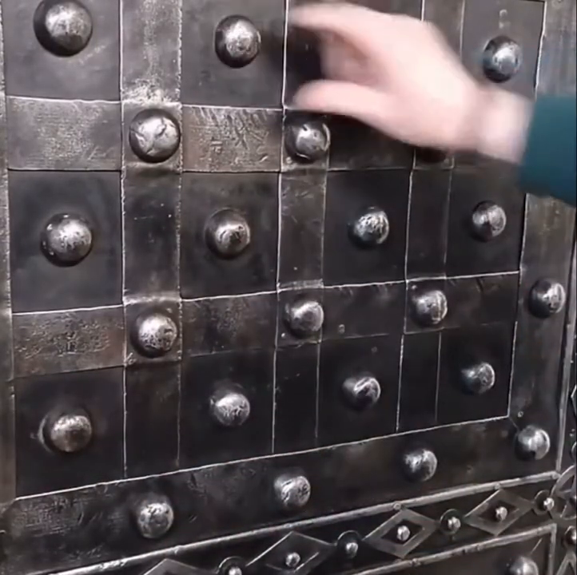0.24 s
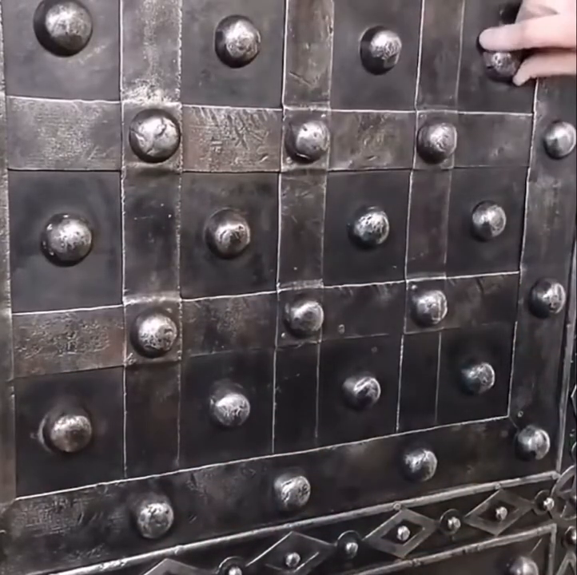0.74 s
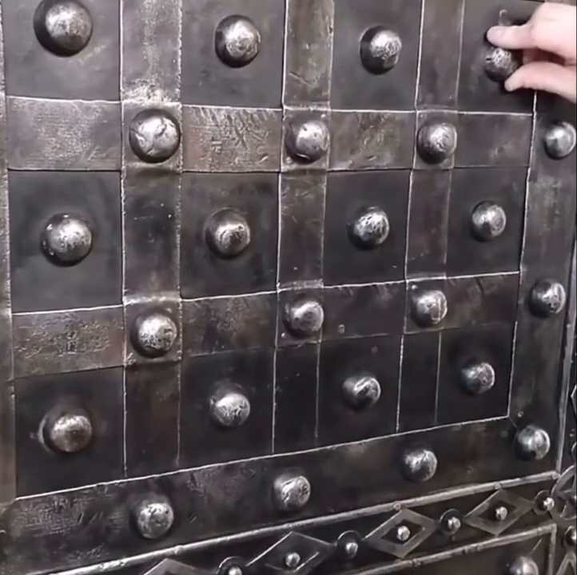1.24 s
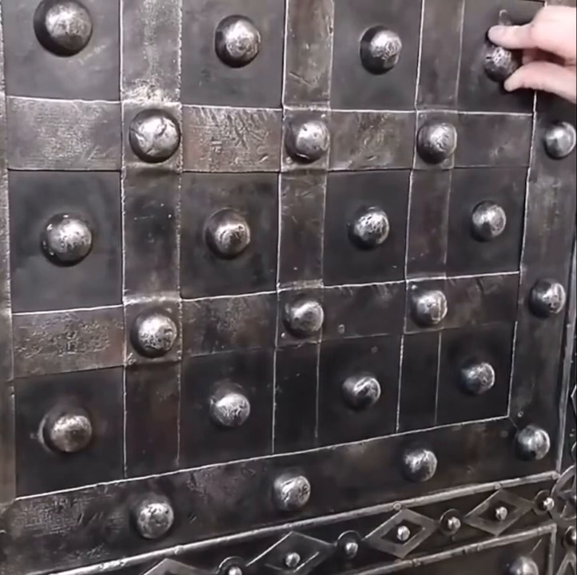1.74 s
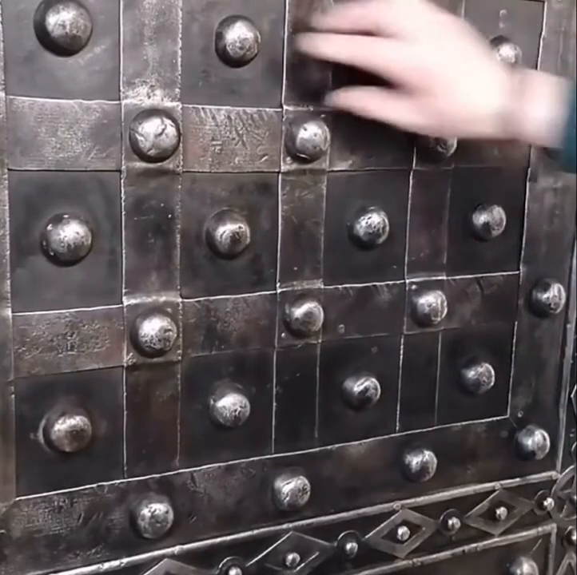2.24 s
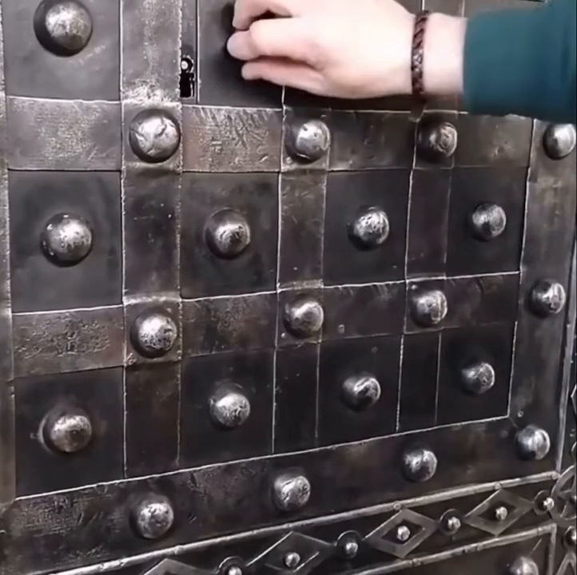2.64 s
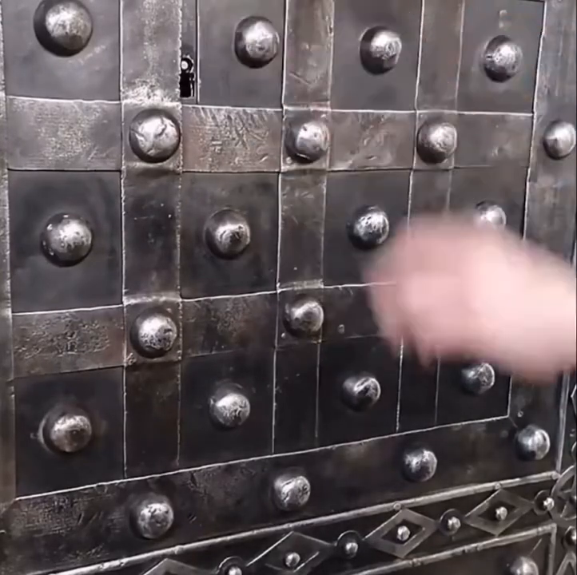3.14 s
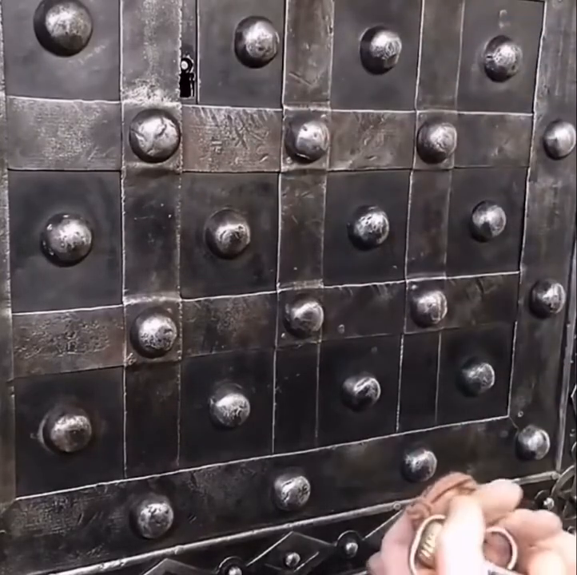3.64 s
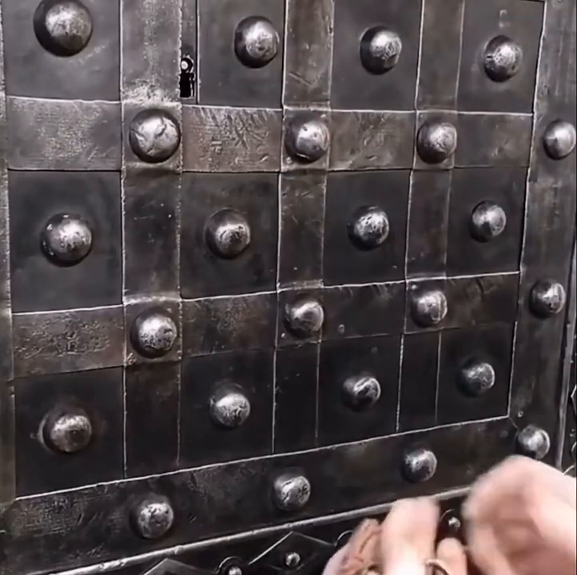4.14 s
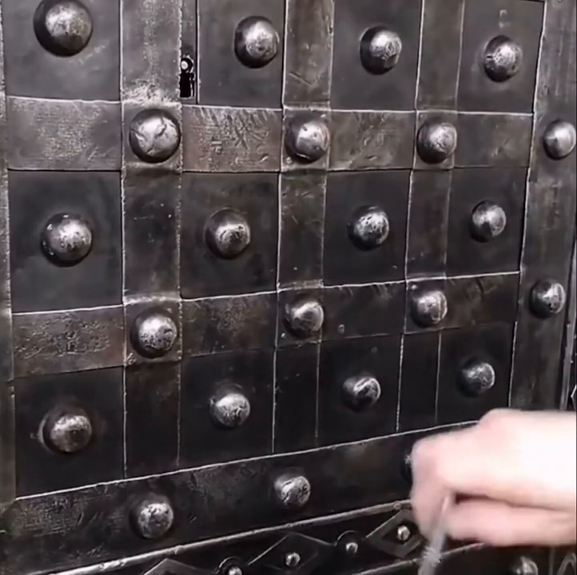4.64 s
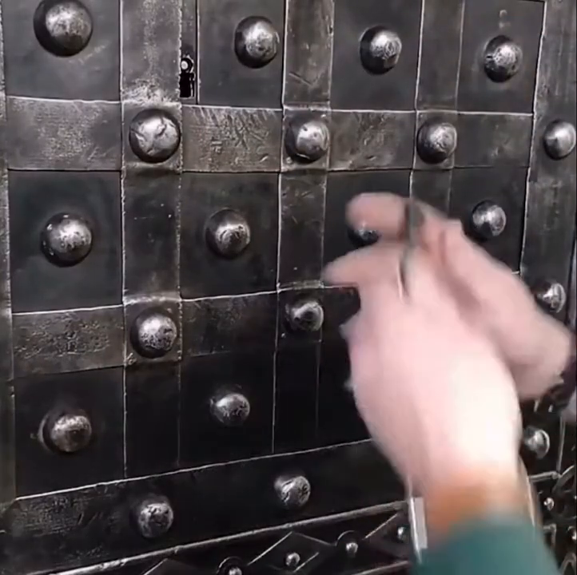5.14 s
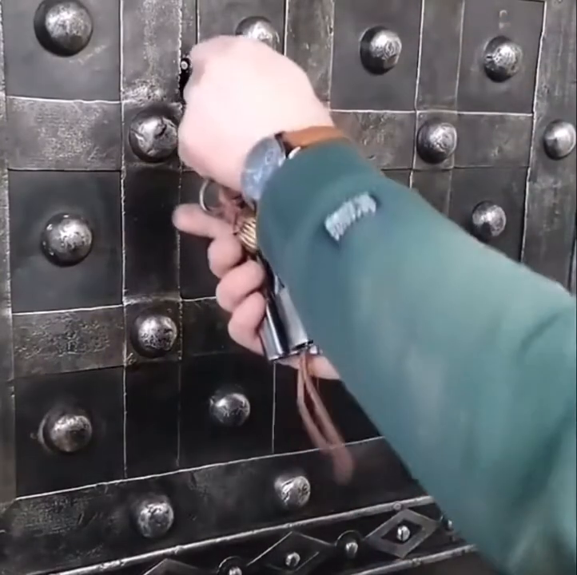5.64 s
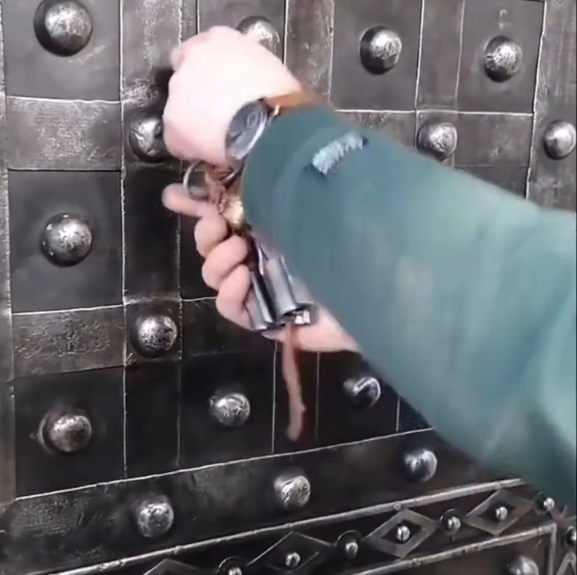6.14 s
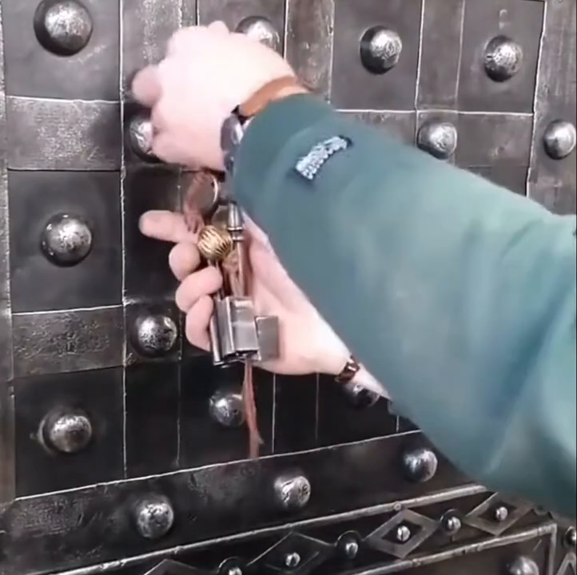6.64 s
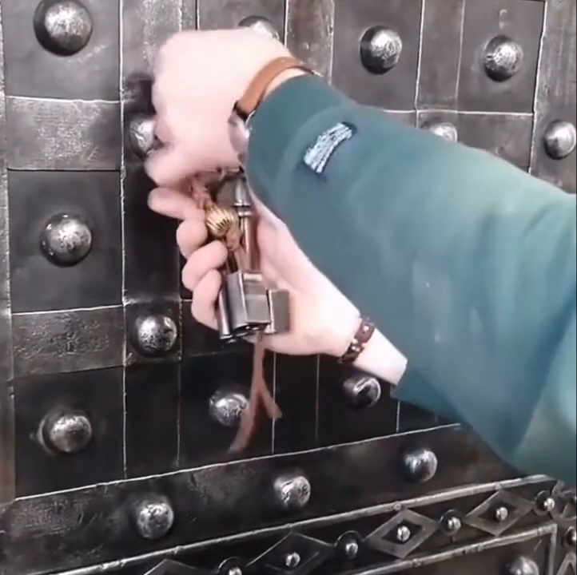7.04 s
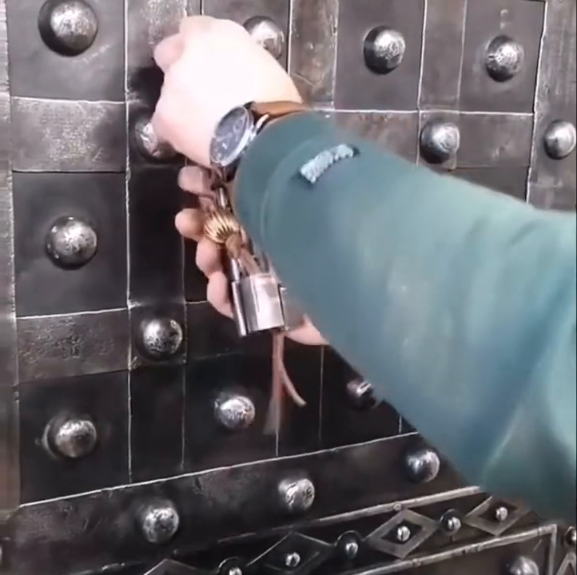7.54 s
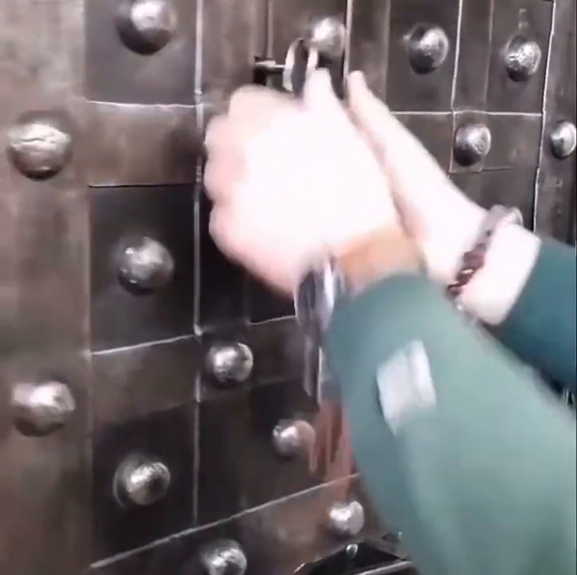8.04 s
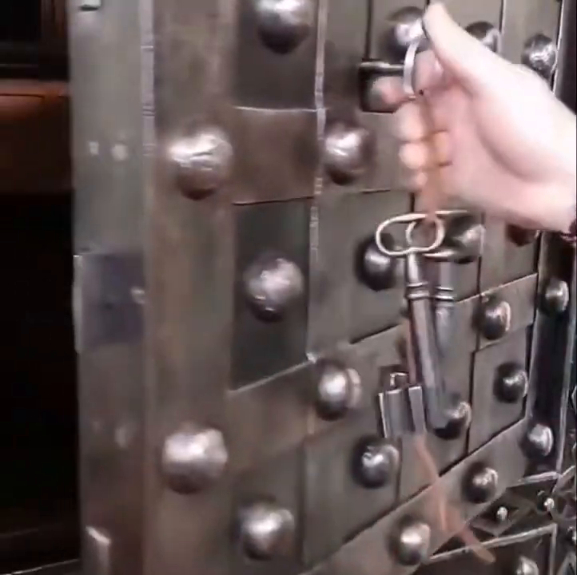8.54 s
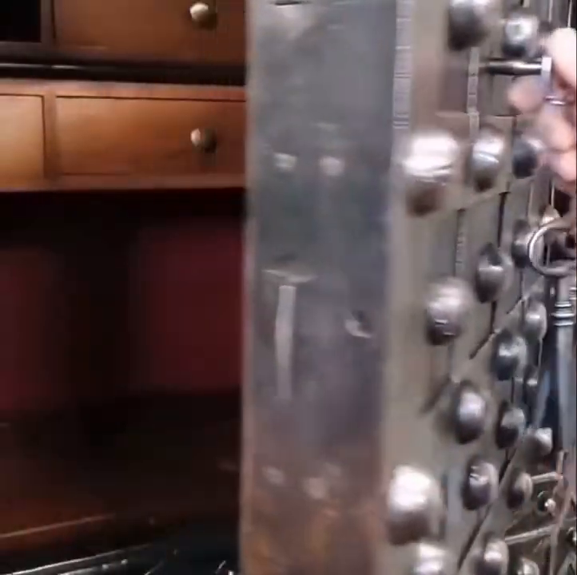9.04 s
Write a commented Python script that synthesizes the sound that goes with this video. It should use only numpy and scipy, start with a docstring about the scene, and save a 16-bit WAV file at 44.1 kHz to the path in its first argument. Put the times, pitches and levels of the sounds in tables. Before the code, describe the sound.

Dry, even metal ticks come first, then a muffled low thump and two sharp snaps. After a quiet moment of rumbling air, a bunch of large iron keys rings brightly. A key grinds and knocks in an old lock, building to a very loud bolt clunk and a second, weaker one. Loose keys tinkle and iron knocks as the heavy door swings. Close microphone, reverberant room, faint hiss.

```python
"""An old iron safe is opened in an echoing room, over rumbling ventilation (filtered noise) and faint hiss.
A stud ticks round on its ratchet (short noise bursts), a hidden catch slides and thumps (jerky noise,
low fading tones), the keyhole cover snaps aside (two sharp noise bursts), and a bunch of big keys clinks
(bursts and wavering tones). A key scrapes into the lock and throws the bolts in growing jerks (bursts,
short tones, jerky noise), and the door swings open with the keys dangling (more knocks, thumps and clinks)."""
import sys
import numpy as np
from scipy import signal
from scipy.fft import rfft, irfft, next_fast_len
from scipy.io import wavfile

SR = 44100
rng = np.random.default_rng(int(sys.argv[2]) if len(sys.argv) > 2 else 0)


def persist_wave(psi):
    """Save psi, clipped to +-1, as 16-bit WAV."""
    counts = np.round(np.clip(psi, -1, 1) * 32767).astype(np.int16)
    wavfile.write(sys.argv[1], SR, np.atleast_2d(counts).T)


N = 410438  # length in samples

# In every table and setting, t60 is the time a sound takes to fall by 60 dB.

# the ventilation's rumble swells once, then eases a little: (time [s], level [dB])
VENT_SWELL = [(2.7, -39), (3.5, -32.5), (6.5, -30.5), (9.3, -32.5)]
# low room modes that the ventilation excites: (frequency [Hz], width [Hz], level [dB])
ROOM_BOOM = [(63, 23.8, -0.5), (172.6, 11, -22), (269.3, 11, -29)]
# colour of the air noise: (frequency [Hz], level [dB])
AIR_COLOUR = [(12, -61), (20, -46), (41, -7), (64, -4), (148, -14), (180, -16.5), (274, -27.5),
              (333, -26.5), (465, -35), (505, -34), (1160, -47), (1720, -49.5), (3450, -60.5), (5850, -64),
              (15500, -82.5)]
# colour of the microphone hiss: (frequency [Hz], level [dB])
HISS_COLOUR = [(8000, -29), (11500, -8), (13000, 1), (15500, -4)]

# single ticks as the stud is gripped, meets its stop and settles: (time [s], level [dB])
STUD_TICKS = [(0.0642, -44.5), (0.827, -37), (0.9902, -44), (1.1257, -50.5), (1.3175, -46)]
# colour of the stud's ticks: (frequency [Hz], level [dB])
STUD_COLOUR = [(300, 3), (700, -6), (1200, 8), (2000, 3.5), (2800, 6), (4200, -27.5), (7000, -24),
               (13000, -35)]
# every ratchet tooth clicks, and the pawl drops back more softly part of a tooth later
RATCHET_START_S, TOOTH_S = 0.2135, 0.154
PAWL_SHARE = 0.55  # part of a tooth's time
TOOTH_DB, PAWL_DB = -37, -43.5
# how quickly the first crack of a blow dies, on the stud and in the lock
STUD_CRACK_T60_S, IRON_CRACK_T60_S = 0.014, 0.025

# how long the room's echo lasts: (frequency [Hz], t60 [s])
ROOM_T60 = [(200, 0.93), (600, 0.7), (1500, 0.76), (3700, 0.71), (7000, 0.47), (12000, 0.42)]
EDGES_HZ = 22 * 2 ** (np.arange(20) / 2)  # borders of the half-octave bands

# iron sliding on iron: (start [s], end [s], level [dB])
STROKES = [(1.69, 1.883, -49), (6.0, 6.2, -49.5), (6.273, 6.674, -41), (7.052, 7.2, -37.5),
           (7.25, 7.32, -35.5), (8.054, 8.123, -36.5)]
STROKE_RISE_DB_PER_S, STROKE_FALL_DB_PER_S = 354, 138.5
# colour of the scraping: (frequency [Hz], level [dB])
RUB_COLOUR = [(80, 9), (170, 22), (300, 10.5), (550, 10.5), (800, -0.5), (1100, 4), (2800, -13.5),
              (6000, -32.5), (10000, -39), (14000, -59.5)]

# iron meeting iron: (time [s], level [dB], hardness [0-1], pitch of the struck part [Hz])
CONTACTS = [(1.731, -47, .1, 820), (1.85, -48.5, 0, 950), (2.131, -50, 0.9, 816),
            (2.419, -42.5, 0.07, 1030), (2.706, -33, 0.91, 2370), (2.761, -29, 0.82, 2465),
            (3.217, -46.5, 0.75, 750), (5.61, -40, 0.3, 750), (5.936, -30, 0.43, 700),
            (5.947, -24.5, 0.7, 1994), (6.155, -35.5, 0.13, 800), (6.224, -31, 0.57, 1360),
            (6.279, -16.5, 0.77, 845), (6.305, -28, 0.93, 785), (6.437, -25.5, 0.7, 1057),
            (6.568, -27, 0.82, 1684), (6.672, -34, 0.42, 1340), (6.772, -37.5, 0.44, 900),
            (6.816, -34, 0.5, 1380), (7.027, -21.5, 0.63, 820), (7.578, -26, 0.81, 1006),
            (7.641, -33, 0.2, 2690), (8.013, -42, 0.84, 820), (8.062, -24, 0.93, 790),
            (8.817, -20, 0.8, 1087), (8.824, -21.5, 0.67, 1160)]
# colour of blows in the lock: (frequency [Hz], level [dB])
IRON_COLOUR = [(180, 5.5), (400, 3), (700, 7), (1000, 0), (1500, 5.5), (2500, -5), (3600, -3), (5500, -9.5),
               (8000, -19), (10000, -12), (13000, -37)]
# resonances of the door plate, mostly narrow: (frequency [Hz], width [Hz], level [dB])
PLATE = [(826, 8.3, -9.5), (905, 32, -20.5), (1008, 12, -32), (1063, 37, -10.5), (1720, 43, -28.5),
         (2260, 38, -2), (2890, 200, 0.5)]
# a hard contact has less bass and more treble than a soft one: dB against the mids
SOFT_BASS_DB, HARD_BASS_DB, SOFT_TREBLE_DB, HARD_TREBLE_DB = 24, -8.5, -33.5, 9

# heavy parts shoving the door; a brisker shove wakes higher modes: (time [s], level [dB], centre [Hz])
THUMPS = [(1.758, 0, 73), (1.839, -3.5, 91), (2.418, -21, 504), (4.086, -26, 810), (5.931, -14.5, 616),
          (6.04, -11, 116), (7.22, -16.5, 183), (7.584, -11.5, 276), (7.606, -12, 141), (7.795, -26, 383),
          (8.069, -24, 245), (8.82, -16, 86)]
# low modes of the door: (frequency [Hz], level [dB], t60 [s])
DOOR_MODES = [(64.2, -0.5, 0.22), (83.5, -2.5, 0.16), (110.7, -4.5, 0.19), (156, -2, 0.15),
              (180.7, 6.5, 0.062), (240.4, 0, 0.15), (254, -7.5, .14), (359, -3, 0.14), (456, 0.5, 0.066),
              (596, -1, 0.055), (807, 4.5, 0.024)]
THUMP_DB_PER_OCTAVE = 19  # modes away from the centre take less

# keys knocking together: (time [s], click [dB], ring of the long key [dB], ring of the short key [dB])
CLINKS = [(3.624, -44.5, -83, -88), (4.132, -48, -69, -54.5), (4.396, -34, -68, -57),
          (4.421, -24.5, -56, -57), (4.796, -19.5, -27, -40.5), (4.923, -25, -36, -34.5),
          (5.209, -37, -49, -65), (5.319, -45.5, -72, -75), (5.469, -23.5, -48, -42.5),
          (6.302, -44, -41, -46), (6.475, -35, -62, -55), (6.925, -45, -62, -56), (7.17, -39.5, -56, -81),
          (8.06, -34, -66, -46.5), (8.218, -36.5, -56, -74), (8.32, -37, -59, -39.5),
          (8.586, -29, -62.5, -29), (8.725, -35, -68, -37.5), (8.817, -24.5, -65, -35.5)]
# colour of the keys' clicks: (frequency [Hz], level [dB])
KEY_CLICK_COLOUR = [(400, -23), (1200, -11.5), (2200, -0.5), (3200, -7.5), (5000, 3), (7500, 0),
                    (10000, -15.5), (13000, -14)]
# modes of the long key: (frequency [Hz], level [dB], t60 [s])
LONG_KEY_MODES = [(1976, -25, .7), (2745, -21, .45), (2939, -12, .6), (3325, -18, .65), (3690, -4, .55),
                  (4092, 0, .7), (4847, -14, .65), (5284, -6, .65), (5698, -9, .6), (6598, -8, .65),
                  (7603, -12, .55), (7752, -20, .45), (8540, -12, .6), (9742, -18, .45), (10282, -16, .45),
                  (12980, -22, .3)]
# modes of the short key: (frequency [Hz], level [dB], t60 [s])
SHORT_KEY_MODES = [(1540, -25, .45), (1970, -17, .65), (2253, -14, .4), (3219, -22, .35), (4110, -9, .5),
                   (4229, 0, .55), (4360, -18, .4), (5523, -5, .5), (6608, -3, .55), (7625, -18, .45),
                   (9830, -21, .4), (12010, -21, .25)]
# modes of the small fittings on the bunch: (frequency [Hz], level [dB], t60 [s])
FITTING_MODES = [(3160, -7, 0.11), (4113, -6, 0.26), (4010, -12.5, 0.15), (4270, -25, 0.13),
                 (4860, -9.5, 0.1), (5450, -9.5, 0.14), (5485, -3.5, 0.14), (5700, 1.5, 0.048),
                 (6400, -22, 0.12), (6700, -6, 0.1), (6830, -15, 0.098), (7510, -13.5, 0.35),
                 (8810, -14.5, 0.091), (9400, -22, 0.28), (9860, -6.5, 0.18), (11960, 5.5, 0.056)]
FITTINGS_DB = -10  # against the click
# the bunch is shaken and chinks ever more softly: (start [s], end [s], fittings [dB], small pieces [dB])
SHAKES = [(4.426, 4.79, -58, -51), (4.815, 5.15, -40.5, -64), (5.15, 5.45, -62, -65),
          (6.295, 6.66, -46.5, -71), (8.225, 8.56, -54, -68)]
SETTLE_DB_PER_S = 25
CHINK_HZ, CHINK_T60_S = (3840, 10540), 0.093  # pitch range and decay of the small pieces
# a key's bow tapped while gripped, leaving one short tone: (time [s], level [dB], pitch [Hz], t60 [s])
PINGS = [(5.211, -37.5, 2260, 0.23), (5.319, -42.5, 1980, 0.11), (8.589, -36.5, 2253, 0.18)]

# the key's bit catches on the wards while it feels its way in
WARDS_S = (5.6, 7.2)
RATTLE_DB, RATTLE_SPREAD_DB = -2, 8  # against the scrape, and how far a catch strays either way
RATTLE_HARDNESS = 0.4
RATTLE_HZ = (804, 1640)  # pitch range of the parts that it touches
# a bolt jerks along, harder each time, up to its stop:
# (stop time [s], level [dB], time between jerks [s], gain per jerk [dB], hardness [0-1], pitch [Hz])
BOLTS = [(7.241, -8.5, 0.019, 7.5, 0.8, 973), (8.112, -18, 0.013, 2, 0.66, 2565)]

METAL_TOP_HZ, CUTOFF_HZ = 10170, 15700  # treble limits of the metal sounds and of everything


def from_db(db):
    """Turn decibels into a gain."""
    return 10 ** (np.asarray(db) / 20)


def rms_one(x):
    """Scale a sound to an average (rms) strength of 1."""
    return x / np.sqrt(np.mean(x ** 2) + 1e-20)


def in_time(rows):
    """Read a table as a curve with a value at every sample."""
    return np.interp(np.arange(N) / SR, *np.transpose(rows))


def at_hz(points, hz):
    """Read a table along a log-frequency axis, as the ear hears pitch."""
    table_hz, values = np.array(points)[:, 0], np.array(points)[:, 1]
    return np.interp(np.log(hz), np.log(table_hz), values)


def bands():
    """Split the sound into half-octave filters, each with its centre frequency."""
    return [(np.sqrt(lo * hi), signal.butter(2, [lo, hi], "band", fs=SR, output="sos"))
            for lo, hi in zip(EDGES_HZ, EDGES_HZ[1:])]


def coloured(noise, colour):
    """Weight the frequencies of noise by a colour table, then scale to rms 1."""
    size = next_fast_len(N)
    hz = np.maximum(np.fft.rfftfreq(size, 1 / SR), 1)
    spectrum = rfft(noise, size) * from_db(at_hz(colour, hz))
    return rms_one(irfft(spectrum)[:N])


def drift(t, rate):
    """A random value that wanders within -1.3 to 1.3, with `rate` new targets a second."""
    knots = np.clip(rng.standard_normal(1000), -1.3, 1.3)
    return np.interp(t * rate, np.arange(len(knots)), knots)


def clicks(times, sizes):
    """Single impulses at the given times."""
    out = np.zeros(N)
    places = np.clip(np.round(times * SR).astype(int), 0, N - 1)
    np.add.at(out, places, sizes)
    return out


def fade(power, t60):
    """Let each pulse of power die away exponentially, as damped vibration does."""
    keep = from_db(-120 / (t60 * SR))  # power falls by twice the dB figure of height
    return signal.lfilter([1], [1, -keep], power + 1e-18)


def resonate(x, hz, width_hz):
    """A resonance lets through the frequencies near its own, with gain 1 at its top."""
    r = np.exp(-np.pi * width_hz / SR)
    feedback = [1, -2 * r * np.cos(2 * np.pi * hz / SR), r * r]
    return signal.lfilter(np.array([1, 0, -1]) * (1 - r * r) / 2, feedback, x)


def blows(times, level_db, colour, crack_t60, body_t60, body_db, rebound_db, uneven_db,
          rebound_s=.007, count=3):
    """A sharp crack with quick rebounds, then the brief ring of countless dense modes, as fading noise."""
    out, white = np.zeros(N), rng.standard_normal((2, N))
    # the parts chatter before they settle, each touch on average weaker than the last
    gaps = rebound_s * rng.uniform(.4, 1.6, (len(times), count))
    touches = times[:, None] + np.cumsum(gaps, axis=1) - gaps[:, :1]
    rebounds_db = rebound_db * np.arange(count)
    for k, (hz, band) in enumerate(bands()):
        if hz > colour[0][0]:
            # every spot that is struck favours other modes
            spot_db = uneven_db * rng.standard_normal(touches.shape)
            db = level_db(hz)[:, None] + at_hz(colour, hz) + rebounds_db + spot_db
            power = clicks(touches.ravel(), from_db(db.ravel()) ** 2)
            crack, body = fade(power, crack_t60), fade(power, body_t60)
            height = np.sqrt(crack + from_db(body_db) ** 2 * body)
            out += signal.sosfilt(band, height * white[k % 2])
    return out / np.sqrt(np.sum(from_db(rebounds_db) ** 2))


def tones(rows, push_s):
    """Rows of (time [s], level [dB], pitch [Hz], t60 [s]): each tone swells with a push and dies away."""
    out = np.zeros(N + SR)
    for s, db, hz, t60 in rows:
        t = np.arange(int(min(t60 + 2 * push_s, 1) * SR)) / SR
        swell = 1 - np.exp(-t / push_s)
        wave = np.sin(2 * np.pi * hz * t) * swell * from_db(db - 60 * t / t60)
        start = round(s * SR)
        out[start:start + len(t)] -= wave
    return out[:N]


def ventilation():
    """Moving air makes even noise, and a rumble that booms in the low room modes."""
    flow = rng.standard_normal(N)
    boom = np.zeros(N)
    for hz, width, db in ROOM_BOOM:
        mode = resonate(resonate(flow, hz, width), hz, width)
        boom += from_db(db) * rms_one(mode)
    air = coloured(rng.standard_normal(N), AIR_COLOUR)
    return from_db(in_time(VENT_SWELL)) * boom + from_db(-38) * air


def microphone_hiss():
    """Faint, steady noise, strongest in the high treble."""
    return from_db(-82) * coloured(rng.standard_normal(N), HISS_COLOUR)


def stud(count=4):
    """The ratchet ticks evenly, tooth after tooth, as the stud turns; a few single ticks join in."""
    teeth = RATCHET_START_S + TOOTH_S * np.arange(count)
    tooth_ticks = [(at, TOOTH_DB) for at in teeth]
    pawl_ticks = [(at + PAWL_SHARE * TOOTH_S, PAWL_DB) for at in teeth]
    s, db = np.transpose(tooth_ticks + pawl_ticks + STUD_TICKS)
    ticks = blows(s, lambda hz: db, STUD_COLOUR, crack_t60=STUD_CRACK_T60_S, body_t60=0.095,
                  body_db=-4, rebound_db=-6, uneven_db=5)
    return from_db(-4) * ticks


def room(x, build_s=0.012):
    """Diffuse echoes build up quickly and die away at a pace set for each band."""
    t, white = np.arange(SR) / SR, rng.standard_normal((2, SR))
    tail = np.zeros(SR)
    for k, (hz, band) in enumerate(bands()):
        tail += signal.sosfilt(band, white[k % 2]) * from_db(-60 * t / at_hz(ROOM_T60, hz))
    echo = rms_one(tail * (1 - np.exp(-t / build_s))) / np.sqrt(SR)
    return signal.fftconvolve(x, echo)[:N]


def rubbing_db(t):
    """Level of the scraping: each stroke rises, holds and falls away; the strongest one counts."""
    levels = []
    for start, end, db in STROKES:
        rise = STROKE_RISE_DB_PER_S * np.maximum(start - t, 0)
        fall = STROKE_FALL_DB_PER_S * np.maximum(t - end, 0)
        levels.append(db - rise - fall)
    return np.max(levels, axis=0)


def scrape(slips_per_s=150, slip_t60=0.075):
    """Rubbing iron sticks and slips in small uneven jerks, each a fading grain of noise."""
    slips = (rng.random(N) < slips_per_s / SR) * rng.exponential(1, N)
    grains = np.sqrt(fade(slips, slip_t60)) * rng.standard_normal(N)
    return from_db(rubbing_db(np.arange(N) / SR)) * coloured(grains, RUB_COLOUR)


def lock(part_db=-8, part_t60=0.047):
    """Iron parts knock and scrape in the lock, and the door plate's resonances colour them."""
    s, db, hardness, part_hz = np.transpose(CONTACTS + bolt_jerks() + ward_rattle())
    bass_db = np.interp(hardness, [0, 1], [SOFT_BASS_DB, HARD_BASS_DB])
    treble_db = np.interp(hardness, [0, 1], [SOFT_TREBLE_DB, HARD_TREBLE_DB])

    def level_db(hz):
        """Strength of every blow at one frequency, by its hardness."""
        bass = at_hz([(480, 1), (900, 0)], hz)
        treble = at_hz([(2400, 0), (4600, 1)], hz)
        return db + bass * bass_db + treble * treble_db

    hits = blows(s, level_db, IRON_COLOUR, crack_t60=IRON_CRACK_T60_S, body_t60=0.13,
                 body_db=-7, rebound_db=-3, uneven_db=3.5)
    # each struck part also rings briefly at a pitch of its own
    part_rows = [(at, level + part_db, hz, part_t60) for at, level, hz in zip(s, db, part_hz)]
    iron = hits + tones(part_rows, push_s=0.00011) + scrape()
    plate = sum(from_db(gain_db) * resonate(iron, hz, width) for hz, width, gain_db in PLATE)
    return iron + plate


def door():
    """Each shove sets the door's low modes booming, favouring those near the shove's centre."""
    rows = []
    for s, db, centre_hz in THUMPS:
        for hz, mode_db, t60 in DOOR_MODES:
            loss_db = THUMP_DB_PER_OCTAVE * abs(np.log2(hz / centre_hz))
            rows.append((s, db + mode_db - loss_db, hz, t60))
    return tones(rows, push_s=0.013)


def keys():
    """Knocking keys click, and the two keys and their small fittings ring at their own modes."""
    s, click_db, long_db, short_db = np.transpose(CLINKS)
    click = blows(s, lambda hz: click_db, KEY_CLICK_COLOUR, crack_t60=0.019, body_t60=.09,
                  body_db=-12.5, rebound_db=-6, uneven_db=5.5)
    long_key = key_ring(s, long_db, LONG_KEY_MODES, uneven_db=1.5, waver=1.4)
    short_key = key_ring(s, short_db, SHORT_KEY_MODES, uneven_db=1.5, waver=1.4)
    chink_s, chink_db, pieces_db = np.transpose(chinks())
    fitting_s, fitting_db = np.r_[s, chink_s], np.r_[click_db + FITTINGS_DB, chink_db]
    fittings = key_ring(fitting_s, fitting_db, FITTING_MODES, uneven_db=3.5, waver=1.7)
    pieces = stray_tones(chink_s, pieces_db)
    return click, long_key + short_key + fittings + pieces + tones(PINGS, push_s=0.00065)


def key_ring(times, level_db, modes, uneven_db, waver, waver_rate=58, size=8):
    """Knocks feed each mode; as keys swing, shifting echoes make the tones waver in level and phase."""
    out, t = np.zeros(N), np.arange(0, N, size) / SR  # level and phase are followed in short blocks
    for hz, mode_db, t60 in modes:
        strength = from_db(level_db + mode_db + uneven_db * rng.standard_normal(len(times)))
        knocks = clicks(times / size, strength ** 2)[:len(t)]
        height = np.sqrt(fade(knocks, t60 / size))
        height = signal.lfilter([.22], [1, -.78], height)  # soften the onset
        wander = 1 + waver * (drift(t, waver_rate) + 1j * drift(t, waver_rate))
        swing = height * wander * np.exp(2j * np.pi * hz * t)
        within_block = np.exp(2j * np.pi * hz * np.arange(size) / SR)
        out += np.outer(swing, within_block).ravel().imag[:N]
    return out / np.sqrt(1 + waver ** 2)


def chinks(count=16):
    """Light touches (time, fittings dB, small pieces dB) at uneven moments, settling in each shake."""
    shares = (np.arange(count) + rng.random((len(SHAKES), count))) / count
    touches = []
    for (start, end, db, pieces_db), row in zip(SHAKES, shares):
        for wait in row * (end - start):
            loss_db = SETTLE_DB_PER_S * wait
            touches.append((start + wait, db - loss_db, pieces_db - loss_db))
    return touches


def stray_tones(times, level_db, count=3):
    """Each touch finds other small pieces, damped by the hand: short tones spread over the treble."""
    spread = (np.arange(count) + rng.random((len(times), count))) / count
    pitches = CHINK_HZ[0] * (CHINK_HZ[1] / CHINK_HZ[0]) ** spread
    rows = [(s, db, hz, CHINK_T60_S) for s, db, row in zip(times, level_db, pitches) for hz in row]
    return tones(rows, push_s=.0003)


def ward_rattle(count=18):
    """Uneven contacts (time, dB, hardness, Hz) of the key in the wards, following how hard it rubs."""
    s = np.interp((np.arange(count) + rng.random(count)) / count, [0, 1], WARDS_S)
    db = rubbing_db(s) + RATTLE_DB + RATTLE_SPREAD_DB * rng.uniform(-1, 1, count)
    part_hz = rng.uniform(*RATTLE_HZ, count)
    return [(at, level, RATTLE_HARDNESS, hz) for at, level, hz in zip(s, db, part_hz)]


def bolt_jerks(count=4):
    """Contacts (time, dB, hardness, Hz) as each bolt jerks harder and harder up to its stop."""
    return [(stop - k * gap, db - k * gain_db, hardness, hz)
            for stop, db, gap, gain_db, hardness, hz in BOLTS for k in range(count)]


def scene():
    """Lock and keys close by, the room answering, their highest treble softened; then door and air."""
    air = ventilation() + microphone_hiss()
    knocks = stud() + lock()
    click, ringing = keys()
    echo = room(from_db(-8.5) * knocks + from_db(-6) * click + from_db(-13.5) * ringing)
    soften = signal.butter(8, METAL_TOP_HZ, fs=SR, output="sos")
    metal = signal.sosfilt(soften, knocks + click + ringing + echo)
    return (metal + door() + air)[None]


def record(dry):
    """A steep filter cuts the top of the treble."""
    return signal.sosfilt(signal.ellip(10, .1, 80, CUTOFF_HZ, fs=SR, output="sos"), dry)


dry = scene()
out = record(dry)
persist_wave(out)
```